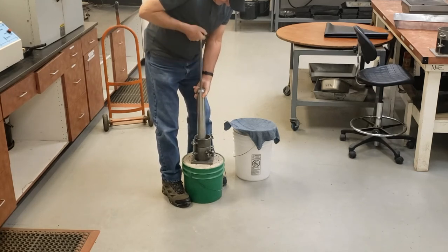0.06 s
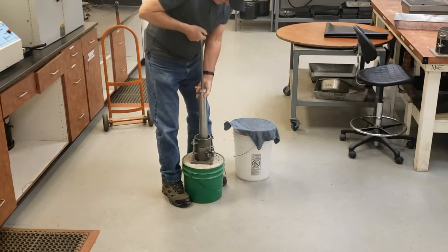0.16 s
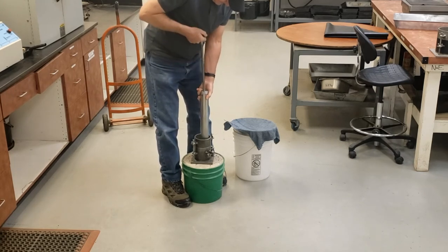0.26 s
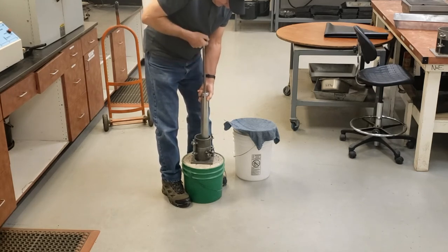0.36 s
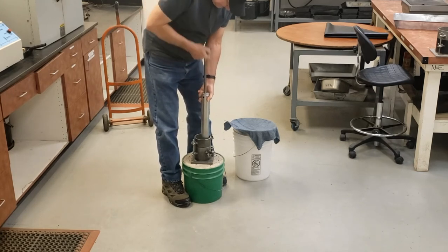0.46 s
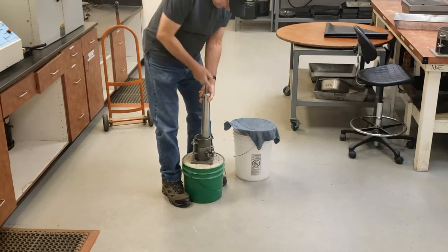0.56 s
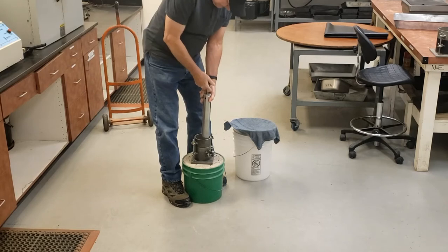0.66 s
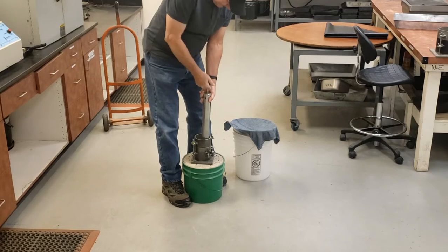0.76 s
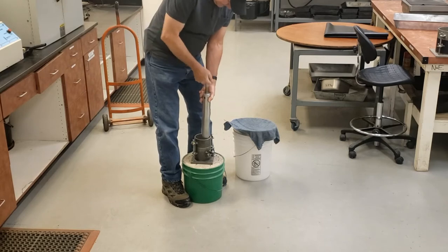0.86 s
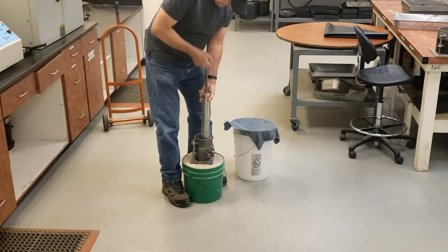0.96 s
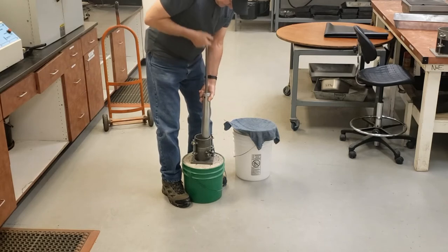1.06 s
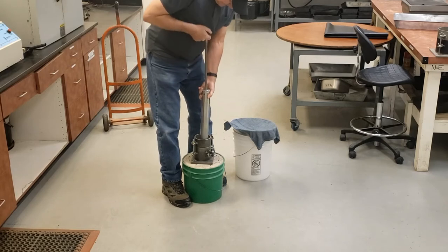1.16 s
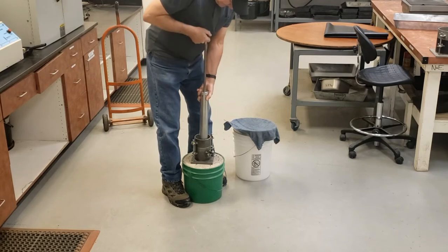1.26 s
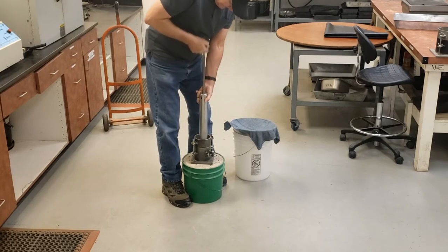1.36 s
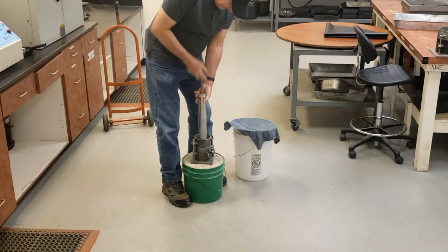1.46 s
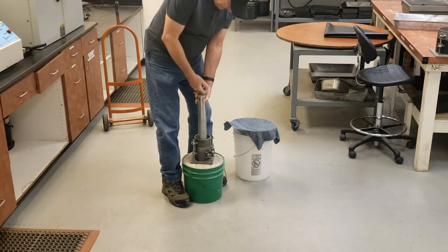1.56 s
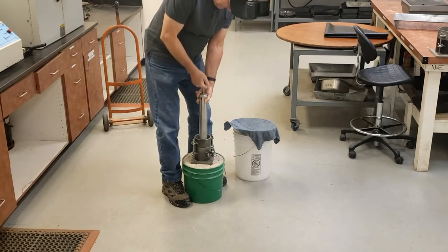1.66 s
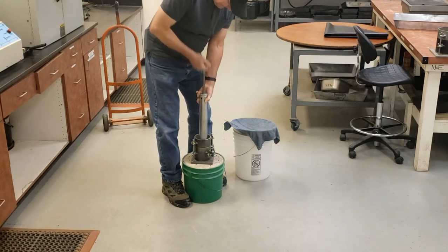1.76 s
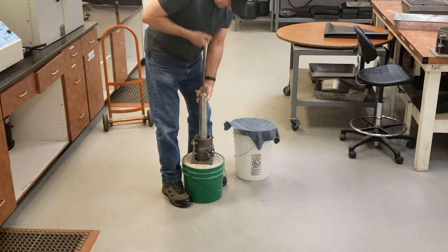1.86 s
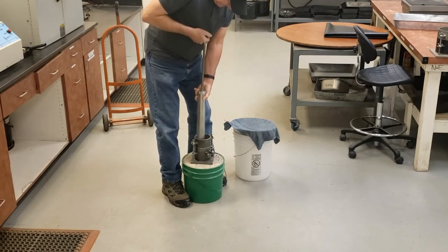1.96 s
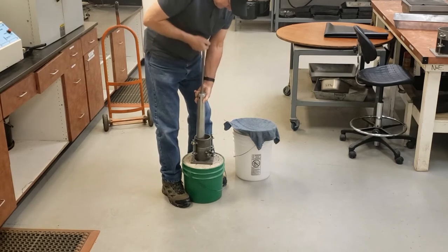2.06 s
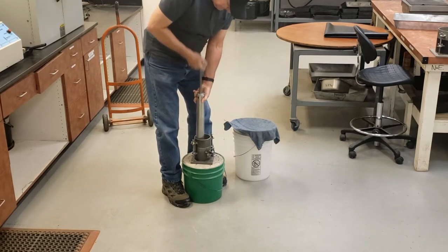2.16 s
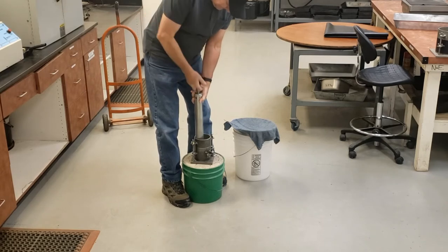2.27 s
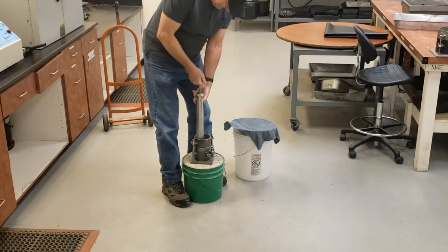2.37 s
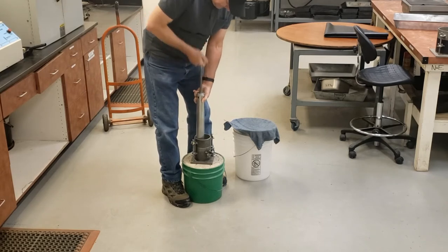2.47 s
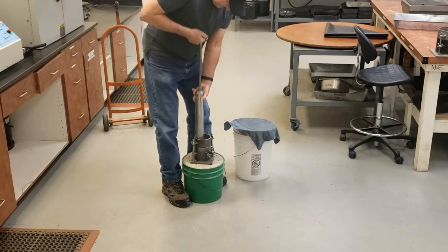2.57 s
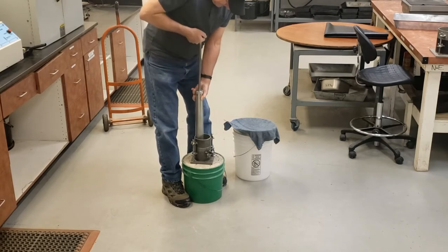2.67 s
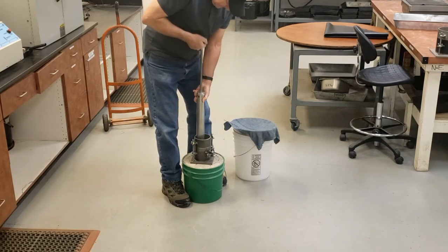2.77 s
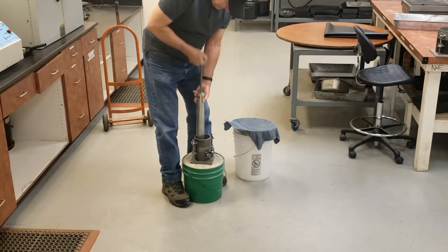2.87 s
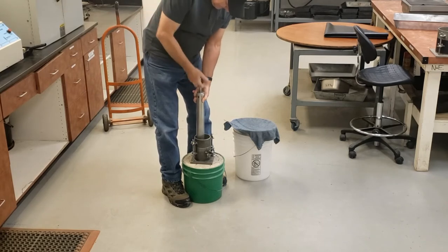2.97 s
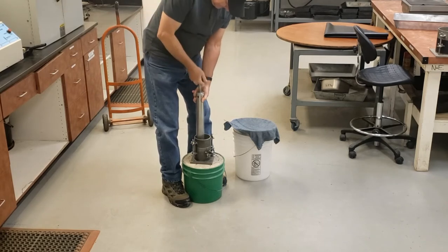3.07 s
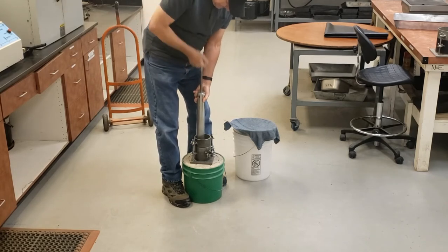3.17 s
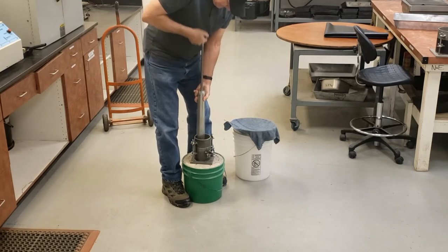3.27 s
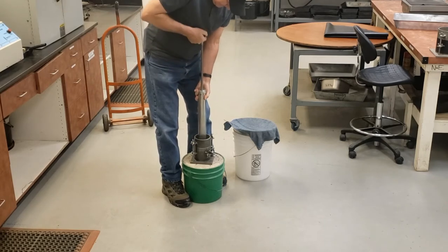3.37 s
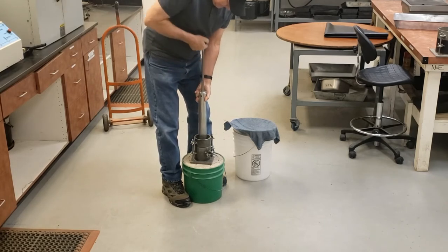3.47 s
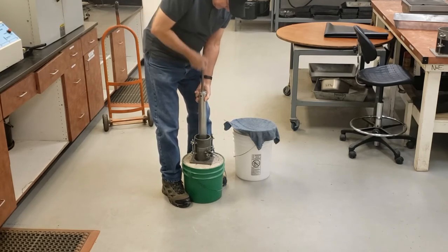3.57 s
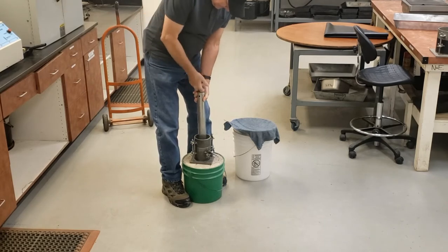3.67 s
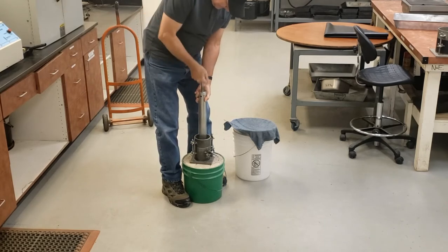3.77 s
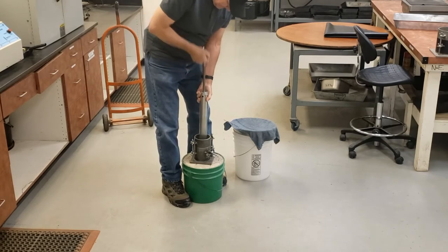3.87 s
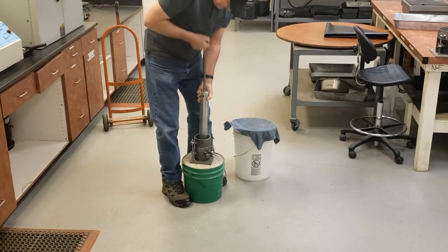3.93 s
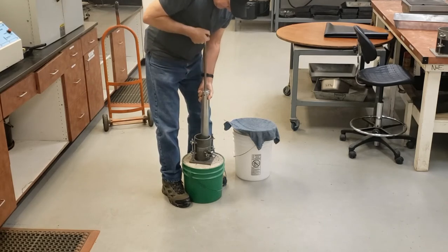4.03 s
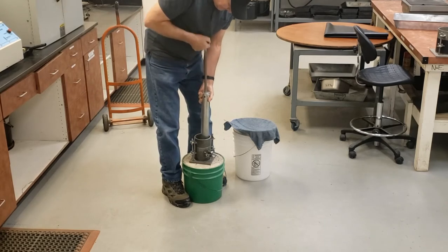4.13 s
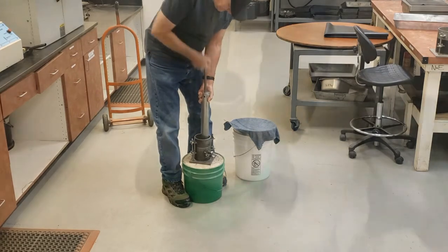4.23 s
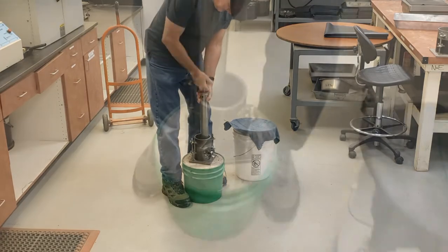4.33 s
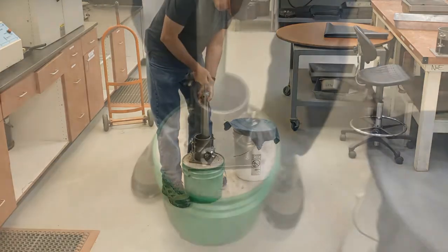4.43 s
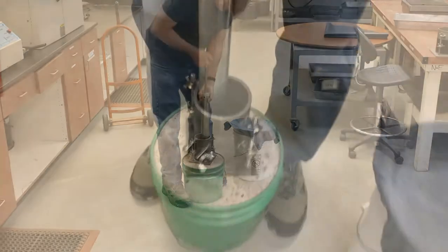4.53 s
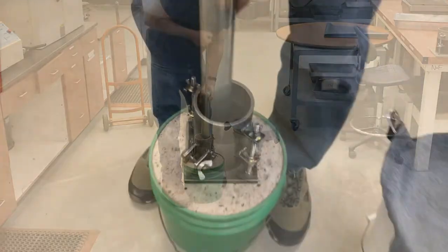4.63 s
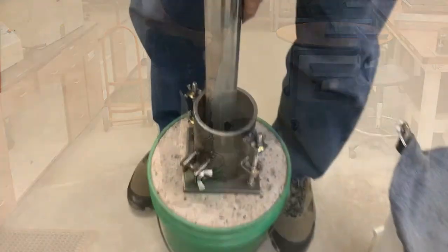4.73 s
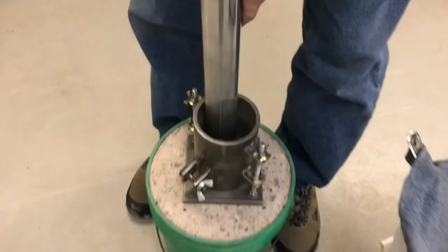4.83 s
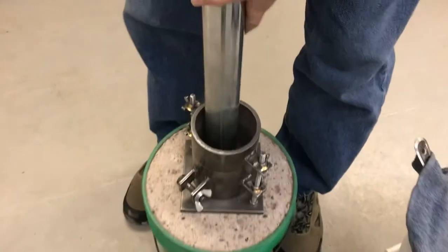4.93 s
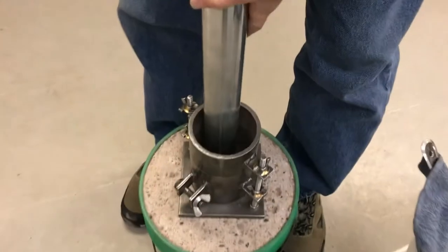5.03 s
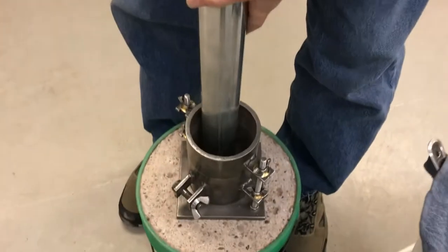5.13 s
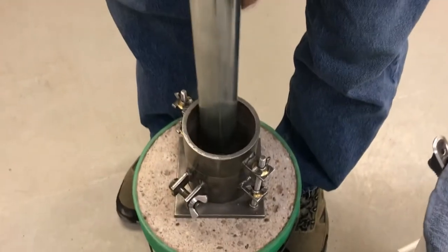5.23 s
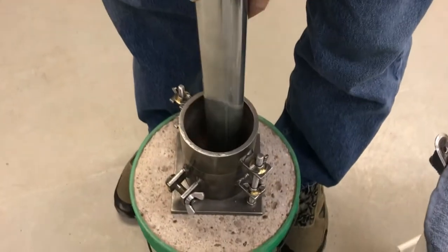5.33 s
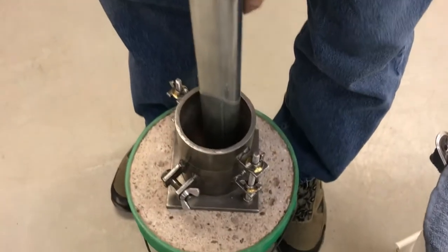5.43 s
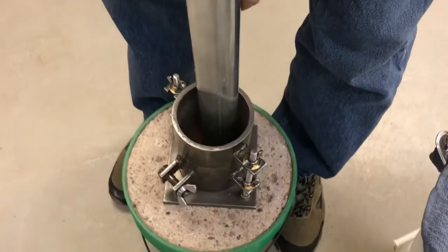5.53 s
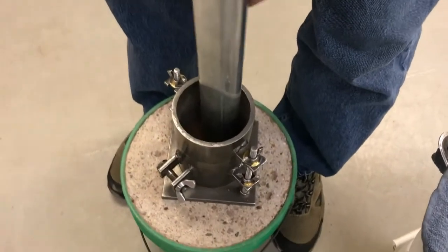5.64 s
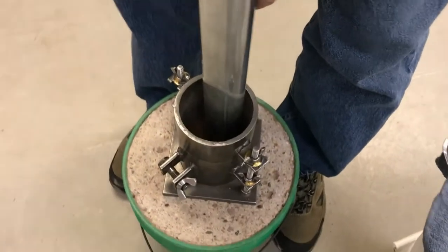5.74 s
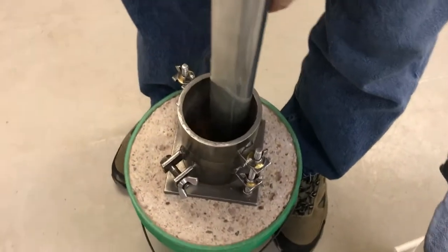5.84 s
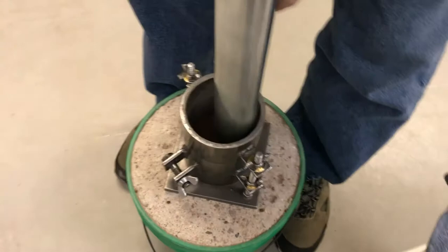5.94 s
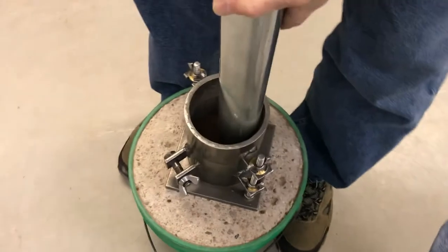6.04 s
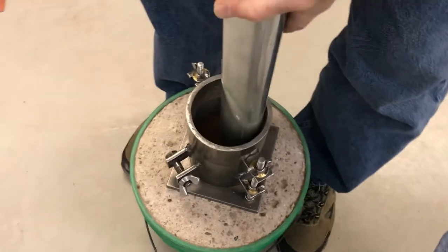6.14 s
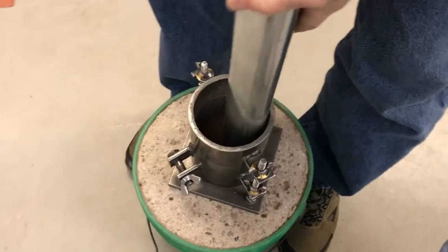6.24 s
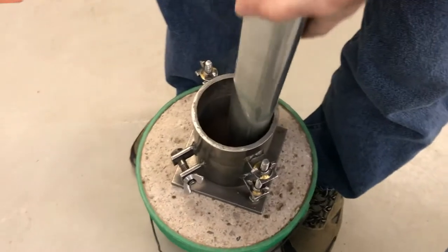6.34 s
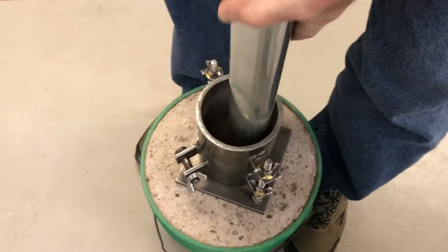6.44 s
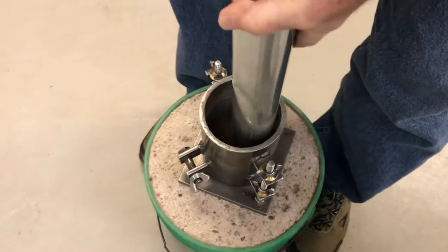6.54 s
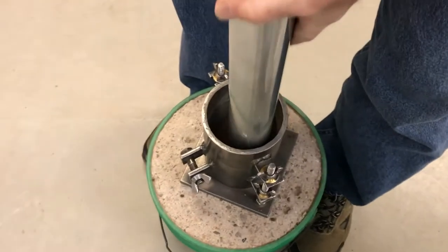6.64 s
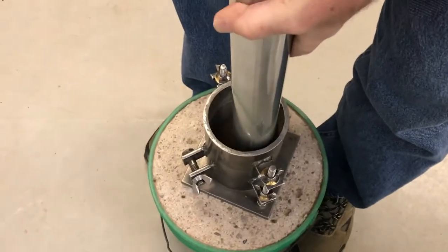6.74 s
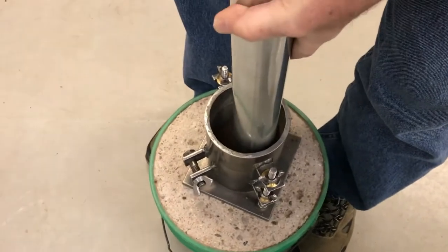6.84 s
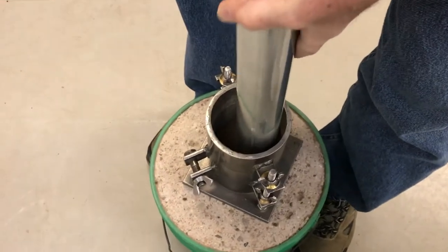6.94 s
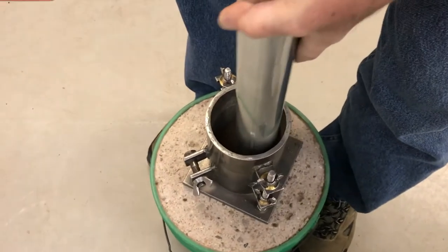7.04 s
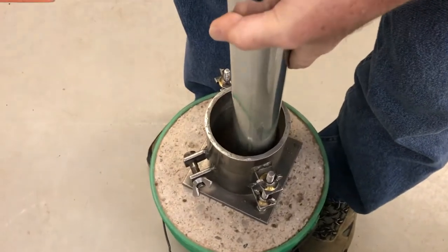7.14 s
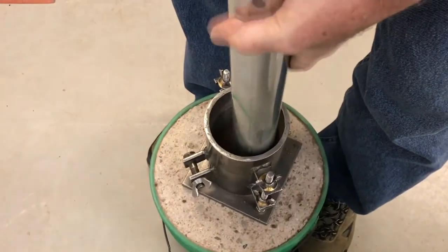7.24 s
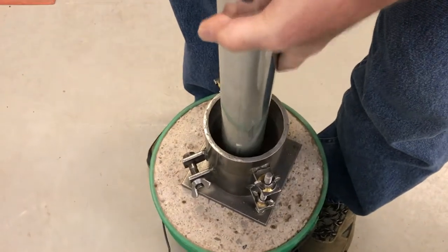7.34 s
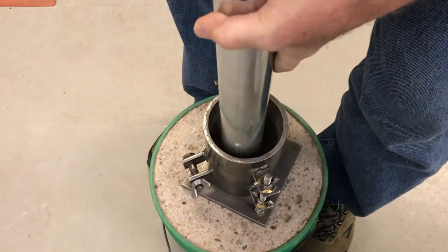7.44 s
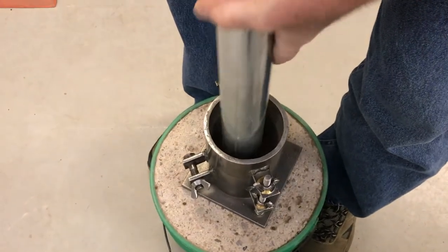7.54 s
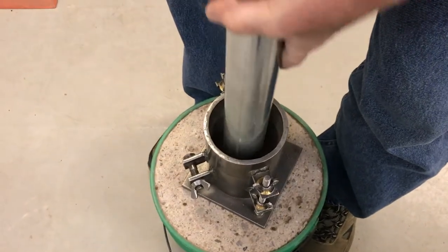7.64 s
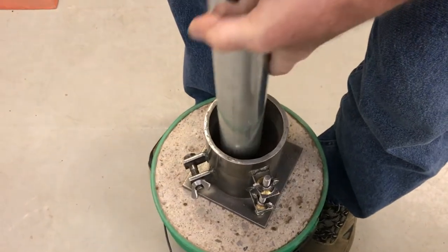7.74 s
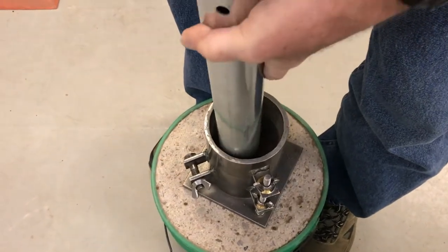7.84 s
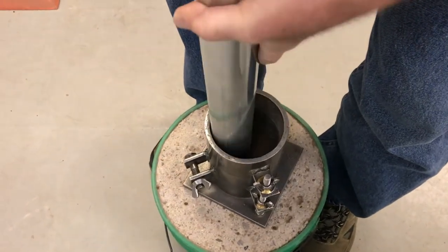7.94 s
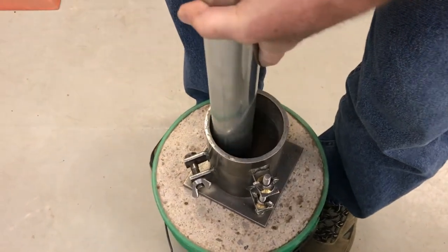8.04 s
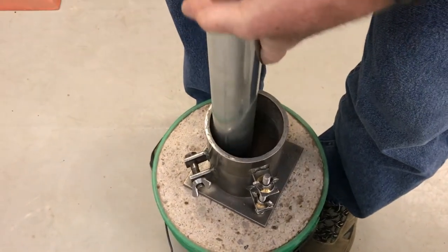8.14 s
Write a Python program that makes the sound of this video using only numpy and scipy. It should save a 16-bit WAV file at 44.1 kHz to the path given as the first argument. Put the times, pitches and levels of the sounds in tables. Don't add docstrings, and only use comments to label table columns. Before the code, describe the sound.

In a hard-floored lab, a metal weight slides on its sleeve, clanks brightly at the top, then drops with a duller thud on soil, about every 0.7 seconds. At first it is across the room, stereo and echoing over low ventilation rumble; after four and a half seconds it crossfades to a dry, mono close microphone with loud clanks, bounces, rattles and scraping.

```python
import sys
import numpy as np
from scipy import signal
from scipy.fft import rfft, irfft, next_fast_len
from scipy.io import wavfile
from scipy.ndimage import uniform_filter1d, minimum_filter1d, map_coordinates

SR = 44100
rng = np.random.default_rng(int(sys.argv[2]) if len(sys.argv) > 2 else 0)


def level_to_linear(level):
    exponent = np.asarray(level, float) / 20
    return 10 ** exponent


def wav_out(sig):
    wavfile.write(sys.argv[1], SR, np.round(np.clip(np.atleast_2d(sig).T, -1, 1) * 32767).astype(np.int16))


N = 361619

SLEEVE_HZ = [260, 576, 895, 1432, 1620, 2120, 3135, 3455, 3662, 3870, 4211, 4400, 4710, 4900, 5250, 5794,
             6338, 7950, 9130, 9830, 10380, 11747, 14900]
# (level [dB], t60 [s])
SLEEVE = [(-11.5, 0.84), (-10.5, 0.27), (-28, 0.79), (-5, 0.49), (-9.5, 0.059), (-7, 0.049), (-6.5, 0.19),
          (-7, 0.017), (-2, 0.27), (-16.5, 0.34), (-33, 0.18), (-9, 0.017), (-19.5, 0.1), (-9.5, 0.13),
          (-33, 0.22), (-23, 0.12), (-4, 0.44), (-26, 0.079), (11.5, 0.48), (10, 0.54), (3, 0.05),
          (14.5, 0.34), (-20, 0.63)]
# (start [s], end [s], level
# [dB], treble [dB])
LIFTS = [(4.496, 4.595, -41.5, -5), (4.835, 4.917, -37, -6), (5.145, 5.242, -32.5, -3.5),
         (5.468, 5.565, -39.5, -6), (5.865, 5.936, -26.5, -6.5), (6.145, 6.21, -39.5, -4),
         (6.538, 6.634, -32, -6.5), (6.863, 6.964, -42.5, -2), (7.227, 7.273, -33.5, -7.5),
         (7.505, 7.551, -39, -7), (7.75, 7.854, -59.5, 7.5), (7.855, 7.946, -38.5, -6),
         (8.145, 8.191, -38.5, -3.5), (4.912, 4.94, -38, -13), (5.599, 5.626, -36, -23),
         (7.558, 7.59, -45, -26), (6.947, 6.96, -58, -24)]
# (start [s], end [s])
DISSOLVE = (3.82, 4.81)


def unit(x):
    return x / np.sqrt(np.mean(x ** 2) + 1e-20)


def along(points, hz):
    f, v = np.transpose(points)
    return np.interp(np.log(hz + 1), np.log(f + 1), v)


def curves(rows):
    s, *cols = np.transpose(rows)
    return [np.interp(np.arange(N) / SR, s, c) for c in cols]


def wobble(rate):
    knots = rng.standard_normal(int(N * rate / SR) + 4)
    return map_coordinates(knots, [np.arange(N) * rate / SR])


def filtered(x, response):
    n = x.shape[-1]
    m = next_fast_len(n + 8192)
    return irfft(rfft(x, m) * response(np.fft.rfftfreq(m, 1 / SR)), m)[..., :n]


def patched(x, patchy_db):
    z = signal.stft(x, nperseg=128)[2]
    field = uniform_filter1d(rng.standard_normal(z.shape), size=2, axis=0)
    field = uniform_filter1d(field, size=12, axis=1)
    return signal.istft(z * level_to_linear(patchy_db * unit(field)), nperseg=128)[1][:len(x)]


def add(track, s, sound):
    track[max(round(s * SR), 0):][:len(sound)] += sound


def clanks(rows, drive_db, damping, grit_db, thump_db, grip_db, held_db_per_s, mid_db, top_db,
           edge_db, shine_db):
    track, t = np.zeros(N + SR), np.arange(SR // 2) / SR
    for s, db, free, low, bright in rows:
        colour = [(300, thump_db), (580, thump_db + 2.5), (1700, low + 6), (3800, 0.0053),
                  (4900, mid_db), (6300, mid_db - 1.0 + 0.87 * bright),
                  (9500, bright + top_db), (12000, bright + edge_db)]
        closing = np.clip((t - free) / 0.0042, 0, 1)
        grip = level_to_linear(grip_db * closing - held_db_per_s * np.clip(t - free, 0, None))
        steel = blow(t, colour, damping, grit_t60=0.2, grit_db=grit_db, rise=0.00033, shine_db=shine_db)
        add(track, s, level_to_linear(db + drive_db) * grip * (1 - (t / t[-1]) ** 4) * steel)
    return track[:N]


def drops(rows, t60, body, ring_db, thud_db, grit_db, rise=0.00098):
    track, t = np.zeros(N + SR), np.arange(SR // 5) / SR
    for s, db, thud, low, top in rows:
        colour = [(500, low - 6), (1700, low + 5), (4000, 0), (8500, top + 5)]
        steel = blow(t, colour, t60 / 0.5, grit_t60=0.81 * t60, grit_db=grit_db, rise=rise,
                     shine_db=-19.0, lumpy_db=4)
        add(track, s, level_to_linear(db + ring_db) * steel)
        soil = ringing(body, t, [(200, 0.025)], 0.79, split_hz=29.0, rise=0.0044, loose=0.99)
        add(track, s, level_to_linear(thud + thud_db) * soil * (1 - t / t[-1]))
    return track[:N]


def blow(t, colour, damping, grit_t60, grit_db, rise, shine_db, lumpy_db=0):
    # (frequency [Hz], level per Hz [dB])
    crack = [(180, -30), (300, 3.5), (1200, -5.5), (1480, -6), (2740, -8), (3080, -9), (4830, -10.5),
             (7320, -9), (16000, -7)]
    noise = rng.standard_normal(len(t))

    def response(hz):
        lumps = lumpy_db * map_coordinates(noise, [hz / 550])
        level = along(crack, hz) + along(colour, hz) + lumps
        return level_to_linear(level) * singing(hz, over_db=12.0, width_hz=115)

    grit = unit(filtered(noise, response))
    dull = filtered(grit, lambda hz: 1 / (1 + (hz / 6500) ** 6))
    grit = dull + (grit - dull) * level_to_linear(9.5 - 60 * t / (0.67 * grit_t60))
    rattle = level_to_linear(grit_db - 60 * t / grit_t60) * (1 - np.exp(-t / rise)) * grit
    lines = [(hz, db + shine_db * (hz > 8000)) for hz, db in colour]
    modes = [(hz, db, t60 * (0.5 if hz > 8000 else 1))
             for hz, (db, t60) in zip(SLEEVE_HZ, SLEEVE)]
    return ringing(modes, t, lines, damping, split_hz=18.9, rise=rise, loose=1.34) + rattle


def ringing(modes, t, colour, damping, split_hz, rise, loose):
    hz, db, t60 = (np.repeat(c, 3)[:, None] for c in np.transpose(modes))
    chance = rng.standard_normal((len(hz), 3))
    lasting = (np.arange(len(hz)) % 3 == 0)[:, None]
    life = t60 * damping * (1 + lasting * np.where(hz > 8000, 0.9, 2.8))
    strength = db + along(colour, hz) + 0.1 * loose * chance[:, :1] - 13.6 * lasting
    level = level_to_linear(strength - 60 * t / life)
    spread = np.clip(hz / 1300, .2, 1)
    split = spread * split_hz * (1 - 0.72 * lasting) * chance[:, 1:2]
    phase = 2 * np.pi * (hz + split) * t + spread * loose * chance[:, 2:]
    return (level * np.sin(phase)).sum(0) * (1 - np.exp(-t / rise))


def singing(hz, over_db, width_hz):
    peaks = [level_to_linear(db + over_db) / (1 + ((hz - c) / width_hz) ** 2)
             for c, (db, _) in zip(SLEEVE_HZ[2:-6], SLEEVE[2:])]
    return 1 + sum(peaks)


def pings(rows):
    track, t = np.zeros(N + SR), np.arange(SR // 2) / SR
    for s, db, hz, t60 in rows:
        trio = np.sin(2 * np.pi * hz * t)
        trio += 0.39 * np.sin(2 * np.pi * (hz + 44.7) * t + hz)
        trio += 0.43 * np.sin(2 * np.pi * (hz - 17.15) * t + s * hz)
        shape = level_to_linear(db - 60 * t / t60) * (1 - np.exp(-t / 0.00054)) * (1 - (t / t[-1]) ** 4)
        add(track, s, shape * trio)
    return track[:N]


def lifts():
    track = np.zeros(N + SR)
    for start, end, db, treble_db in LIFTS:
        t = np.arange(round((end - start) * SR)) / SR
        kicks = (rng.random(len(t)) < 220 / SR) * level_to_linear(1.2 * rng.standard_normal(len(t)))
        bursts = signal.lfilter([1], [1, -np.exp(-1 / (0.00022 * SR))], kicks)
        catches = rng.standard_normal(len(t)) * (.5 + bursts)
        edges = np.clip(np.minimum(t / 0.027, (end - start - t) / 0.007), 0, 1)
        colour = [(500, -0.5), (1500, 0.0), (5000, 1.5), (10000, treble_db)]
        tone = lambda hz: level_to_linear(along(colour, hz)) * singing(hz, over_db=3.5, width_hz=110)
        grating = patched(filtered(catches, tone), patchy_db=5)
        add(track, start, level_to_linear(db) * edges * unit(grating))
    return track[:N]


def jolts():
    # (time [s], peak [dB])
    pushes = [
        (5.247, -2),
        (5.937, -29),
        (6.638, -6.5),
        (7.29, -3.5),
        (7.929, 12.5),
    ]
    track, t = np.zeros(N + SR), np.arange(SR // 5) / SR
    for s, db in pushes:
        swing = np.sin(2 * np.pi * 55 * t) * (1 - np.exp(-t / 0.012))
        add(track, s, level_to_linear(db + 2.5 - 60 * t / 0.043) * swing)
    return track[:N]


def sliding(slides, blows, rest_db, shake_db, shake_t60, hiss_t60):
    t = np.arange(N) / SR
    scrape, hiss = np.outer(level_to_linear(rest_db), np.ones(N))
    for start, end, db, hiss_db in slides:
        settling = level_to_linear(db - 60 * np.clip(t - end, 0, None) / 0.55)
        shape = settling * np.clip((t - start) / 0.0092, 0, 1)
        scrape, hiss = scrape + shape, hiss + level_to_linear(hiss_db) * shape
    for s, *_ in blows:
        since = np.clip(t - s, 0, None)
        scrape = scrape + level_to_linear(shake_db[0] - 60 * since / shake_t60) * (t > s)
        hiss = hiss + level_to_linear(shake_db[1] - 60 * since / hiss_t60) * (t > s)
    return scrape, hiss


def bed(vent_rows, motion, scrape, alike, sing_db, rough_db, patchy_db):
    # (frequency [Hz], level per Hz [dB])
    rumble = [(12, -46), (20, -39), (38, -7.5), (62, -5.5), (129, -16), (151, -22.5), (195, -19.5),
              (270, -27.5), (921, -39), (1500, -46.5), (1950, -79), (3300, -120)]
    draught = level_to_linear(curves(vent_rows)[0] + 2.65 * wobble(4.62))
    vent = draught * rush(lambda hz: level_to_linear(along(rumble, hz)), alike, patchy_db=-2.0)
    catches = level_to_linear(rough_db * (wobble(45) + 0.088 * np.abs(wobble(180))))
    tone = lambda hz: level_to_linear(along(scrape, hz)) * singing(hz, sing_db, width_hz=46)
    slide = unit(catches * rush(tone, alike, patchy_db))
    body = filtered(slide, lambda hz: 1 / (1 + (hz / 6800) ** 12))
    return vent + motion[0] * unit(body) + motion[1] * unit(slide - body)


def rush(gain, alike, patchy_db):
    z = signal.stft(rng.standard_normal((2, N)), nperseg=256)[2]
    field = uniform_filter1d(rng.standard_normal(z.shape[1:]), size=5, axis=0)
    field = uniform_filter1d(field, size=9, axis=1)
    pair = signal.istft(z * level_to_linear(patchy_db * unit(field)), nperseg=256)[1][:, :N]
    turn = lambda hz: np.arccos(np.clip(along(alike, hz), -1, 1)) / 2
    mid, side = filtered(pair, lambda hz: gain(hz) * [np.cos(turn(hz)), np.sin(turn(hz))])
    return unit(np.array([mid + side, mid - side]))


def lab(x, shorten):
    # (frequency [Hz], t60 [s])
    room_t60 = [(100, 0.51), (500, 0.81), (2000, 0.52), (6000, 0.44), (12000, 0.28)]
    wet, step = np.zeros((2, N + 2 * SR)), SR // 3
    for k in range(0, N, step):
        hz, t, z = signal.stft(rng.standard_normal((2, SR * 2 // 3)), SR, nperseg=256)
        decay = level_to_linear(-60 * t / (shorten * along(room_t60, hz))[:, None])
        tail = signal.istft(z * decay, SR, nperseg=256)[1]
        part = signal.fftconvolve(x[None, k:k + step], tail / np.linalg.norm(tail[0]), axes=1)
        wet[:, k + 250:][:, :part.shape[1]] += part
    return wet[:, :N]


def limited(x, top):
    need = np.minimum(1, top / (np.abs(x).max(0) + 1e-9))
    return x * uniform_filter1d(minimum_filter1d(need, size=89), size=44)


def near_camera():
    # (time [s], peak [dB], free ring [s], low ring [dB], top ring [dB])
    stops = [
        (4.5852, -7, 0.064, -7.5, -10),
        (5.2441, 1.5, 0.042, -11, -12),
        (5.9389, -3.5, 0.025, -9.5, -10.5),
        (6.636, -6, 0.037, -6.5, -8),
        (7.2934, -5, 0.035, -14, -14.5),
        (7.933, -4.5, 0.033, -9, -7),
    ]
    # (time [s], peak [dB], thud [dB], low ring [dB], top ring [dB])
    landings = [
        (4.274, -9.5, -24.5, -5.5, -13.5),
        (4.9333, -2.5, -14, -12.5, -18),
        (5.626, -2.5, -11.5, -4, -11),
        (6.28, 7.5, -14, -16.5, -11),
        (6.9658, -0.5, -14, -5.5, -8.5),
        (7.5849, 4, -14.5, -5.5, -8.5),
    ]
    # (time [s], peak [dB], low ring [dB], top ring [dB])
    skips = [(4.9463, 0, -7, -16), (5.006, -15, -14, -18), (5.0186, -20, -6, -26),
             (5.0434, -10, -16, -22.5), (5.068, -24, -5, -29), (5.1027, -12.5, -7, -14),
             (5.638, -21, 5.5, 4), (5.676, -34, -12, -12), (5.683, -9, -7, -6.5),
             (5.7391, -11.5, -8, -16.5), (5.7922, -20, -2, -11), (6.2894, -8, 10.5, 0),
             (6.353, -14.5, -22, -15), (6.4017, -7.5, -12, -5.5), (7.0409, -11.5, -12, -7),
             (7.087, -15, -12, -10), (7.645, -15, -7, -7), (7.7057, -11, -13, -5.5)]
    # (time [s], peak [dB], low ring [dB], top ring [dB])
    knocks = [(4.4364, -19, -4, -17), (4.462, -24.5, -10, -13), (4.8795, -21, -5, -15),
              (5.35, -25, -14, -11), (5.581, -23, -12, -19), (5.9771, -9.5, -9, -16),
              (6.036, -20, -17, -15), (6.2492, -19.5, -3.5, -14), (6.3012, -12.5, -28, -7),
              (6.814, -30.5, 3, -22), (6.862, -30.5, -15, -8), (6.911, -29, -15, -18),
              (7.158, -41, 14, -25), (7.19, -34, -18, 8), (7.219, -21, -1, -11), (7.251, -35, -10, -20),
              (7.416, -23.5, -10, -11.5), (7.441, -31.5, -1, -15), (7.489, -29, -11, -19),
              (7.515, -20, -1.5, -15), (7.547, -25, -8, -15), (8.048, -20, -7, -12),
              (8.1357, -30.5, -10, -11)]
    # (time [s], peak [dB], low ring [dB], top ring [dB])
    snags = [(4.8468, -35, -19, -4), (5.035, -19, -8, -9), (5.1496, -37, -10, -10), (5.186, -19, -12, -12),
             (5.206, -20, -12, -14), (5.33, -18.5, -5, -18), (5.367, -25, -12, -16), (5.421, -48, -11, -16),
             (5.4773, -32, -17.5, -24), (5.4913, -31, -22, -16), (5.5257, -28.5, -9, -3),
             (5.779, -41, -7, -16), (5.8753, -16.5, -5, -16), (5.891, -34, -4, -14), (6.1588, -34, -7, -16),
             (6.1858, -23.5, -18, -15), (6.5544, -25, -5, 9), (6.582, -17.5, -4, -12),
             (6.6222, -17.5, -20, -17), (7.049, -17, -17, -14), (6.411, -26, -15, -16),
             (5.637, -15, -1, -9), (7.237, -28, 5, -14), (7.27, -18, -20, -16), (7.847, -32, -6, -1),
             (7.8928, -27, -13, -14)]
    # (time [s], peak [dB], frequency [Hz], t60 [s])
    contact_pings = [(5.0045, -16, 3650, 0.036), (5.043, -4.5, 3660, 0.034), (5.0715, -28, 3490, 0.045),
                     (5.103, -29, 2220, 0.056), (5.1865, -26, 4470, 0.048), (5.258, -1.5, 6330, 0.044),
                     (5.25, -1, 4900, 0.095), (5.3, -31, 3665, 0.42), (5.26, -4.5, 1450, .08),
                     (5.305, -20.5, 2155, .06), (5.34, -28, 4280, .06), (5.671, -14, 3670, 0.043),
                     (5.684, -11, 3780, 0.041), (5.74, -23, 3660, 0.045), (5.905, -30, 3000, 0.037),
                     (5.9385, -3.5, 4900, 0.075), (5.948, 0.5, 3654, 0.069), (6.008, -20, 4230, 0.072),
                     (6.036, -18, 4230, 0.062), (6.25, -24, 3674, .08), (6.353, -26, 3530, 0.042),
                     (6.4025, -2, 3560, 0.028), (6.403, -21, 4900, 0.074), (6.41, -22.5, 2175, 0.034),
                     (6.637, 1.5, 3670, 0.12), (6.637, 0.5, 4975, 0.077), (6.967, -7, 3297, 0.022),
                     (7.041, -14, 3580, 0.047), (7.044, -14, 1475, 0.037), (7.087, -18, 3430, 0.034),
                     (7.157, -34, 2190, 0.026), (7.2455, -15, 3470, 0.037), (7.294, -8, 4886, 0.083),
                     (7.294, -3.5, 9130, 0.086), (7.309, -13, 4510, .03), (7.417, -30.5, 1465, 0.076),
                     (7.49, -33, 3640, .05), (7.294, -22, 7870, 0.074), (5.89, -26, 2300, 0.055),
                     (5.92, -36, 3130, 0.046), (5.2, -26, 3110, 0.046), (5.63, -17, 591, 0.085),
                     (6.97, -27.5, 601, 0.17), (7.646, -10, 3490, 0.024), (7.707, -8.5, 3647, 0.049),
                     (8.049, -26.5, 3760, 0.04),
                     (4.899, -24, 5200, .03), (4.899, -29, 2150, .04), (4.948, -13, 3266, 0.054),
                     (5.8, -39, 600, 0.24), (6.283, -8.5, 3114, 0.072), (6.29, 0, 1455, 0.06),
                     (7.936, -10.5, 6340, .14), (7.047, -41, 9560, 0.064), (7.09, -29, 4870, 0.058),
                     (7.936, -9, 4900, 0.069)]
    # (frequency [Hz], level [dB], t60 [s])
    block = [(112.7, -8.5, 0.88), (174.6, -5, 0.5), (212.5, 10.5, 0.071), (252.7, 9.5, 0.077),
             (347.5, -4.5, 0.13), (589, -6, 0.096)]
    # (frequency [Hz], level per Hz [dB])
    scrape = [(180, -1), (300, -3), (773, -5.5), (995, -8.5), (1360, -7.5), (4110, -10.5), (4590, -7),
              (7250, -24.5), (11800, -28), (13000, -64)]
    # (time [s], level [dB])
    vent_rows = [(4.2, -49), (4.55, -38.5), (4.9, -53), (5.17, -46), (5.6, -49.5), (6.2, -50), (6.5, -46),
                 (6.9, -53.5), (8.2, -53)]
    # (ring [dB], rattle over it [dB], rise [s])
    thuddy = (-15, 9.33, 0.0016)
    pingy = (-10, 5, .0006)

    steel = clanks(stops, drive_db=-0.5, damping=0.55, grit_db=-3.0, thump_db=-17.0, grip_db=-11.5,
                   held_db_per_s=59, mid_db=5.5, top_db=4.0, edge_db=-5.0, shine_db=-16.5)
    bounces = [(s, db, -36.5, low, top) for s, db, low, top in skips]
    ticks = [(s, db, -50.5, low, top) for s, db, low, top in knocks]
    contacts = (landings, 0.068, thuddy), (bounces, 0.051, pingy), (ticks, 0.11, thuddy)
    for rows, t60, (ring_db, grit_db, rise) in contacts:
        steel = steel + drops(rows, t60, block, ring_db, thud_db=-8.0, grit_db=grit_db, rise=rise)
    steel = steel + pings(contact_pings)

    fade_in = np.interp(np.arange(N) / SR, DISSOLVE, [0, 1])
    slides = [(start, end, -28.5 + 0.56 * db, treble_db + 8.0) for start, end, db, treble_db in LIFTS]
    slides += [(s, s + 0.16, -43, -11) for s, *_ in landings]
    motion = sliding(slides, stops + landings, rest_db=[-48, -63], shake_db=[-32, -38],
                     shake_t60=0.11, hiss_t60=0.1)
    air = bed(vent_rows, motion, scrape, [(100, 1.0)], sing_db=14.5, rough_db=2.0, patchy_db=4.6)[0]
    room = level_to_linear(-14.5) * lab(steel, shorten=0.32)[0] + fade_in * air
    catches = [(s, db, -70, low, top) for s, db, low, top in snags]
    caught = drops(catches, 0.076, block, -15, thud_db=0, grit_db=7.5)
    mix = steel + lifts() + caught + jolts() + room
    sound = limited(mix[None], top=1.02 * np.clip(fade_in, .1, 1) ** 2.33)
    return filtered(sound, lambda hz: 1 / (1 + (hz / 12300) ** 70) * (1j * hz / (34 + 1j * hz)) ** 2)


def far_camera():
    # (time [s], peak [dB], free ring [s], low ring [dB], top ring [dB])
    stops = [
        (0.0105, -10.5, 0.035, -8, -1.5),
        (1.1369, -8.5, 0.072, -10, -4),
        (1.927, -8, 0.059, -12, -4.5),
        (2.609, -7, 0.034, -8, -1),
        (3.3203, -7.5, 0.039, -9.5, -3),
        (4.0216, -8, 0.023, -11.5, -6),
        (4.6824, -22.5, 0.044, -10.5, -5.5),
    ]
    # (time [s], peak [dB], thud [dB], low ring [dB], top ring [dB])
    landings = [
        (0.639, -20, -38.5, -15.5, -12.5),
        (1.5685, -18.5, -30.5, -8.5, -5),
        (2.302, -17, -34.5, -10.5, -10.5),
        (3.021, -21, -28, -7, -8),
        (3.692, -20, -26.5, -10, -5),
        (4.353, -21.5, -31.5, -7, -9),
    ]
    # (time [s], peak [dB], thud [dB], low ring [dB])
    knocks = [(0.421, -47, -71, -10), (0.874, -49, -52, 0), (1.4061, -30, -68, 1), (1.529, -40.5, -47, 7),
              (1.715, -30.5, -53, -7.5), (1.745, -33.5, -63, -10), (2.2762, -30.5, -64, -8),
              (2.393, -34.5, -65, -6), (2.996, -52, -55, -27), (3.1086, -30.5, -38.5, -7.5),
              (3.256, -36, -50, -8), (3.658, -37, -52, -2), (3.751, -25, -54, -8.5), (4.215, -33, -52, -21)]
    # (time [s], peak [dB], frequency [Hz], t60 [s])
    far_pings = [(0.01213, -36, 3665, 1.07), (3.322, -22, 4890, 0.2), (3.322, -34, 3680, 0.87),
                 (2.611, -42, 3646, 0.78), (1.928, -27, 3665, 0.54), (1.928, -20, 6340, 0.2),
                 (1.138, -22, 1440, 0.52), (1.138, -37, 3665, 0.98), (2.302, -31, 3000, .08),
                 (2.302, -40, 2160, .08), (1.928, -28, 1440, 0.45), (4.023, -40, 3710, 0.71),
                 (2.3, -42, 6300, 0.18), (4.354, -48, 6420, 0.18), (2.998, -38, 5780, 0.056),
                 (.012, -32, 4900, 0.35), (.012, -30, 6340, 0.4), (.28, -53, 2270, 0.073),
                 (0.87, -51, 5830, .08), (1.138, -29.5, 4970, 0.56), (1.138, -19, 3100, 0.072),
                 (1.155, -23, 3674, 0.31), (1.37, -53, 3720, .08), (1.404, -38.5, 2200, 0.062),
                 (1.6, -39, 3700, 0.099), (1.928, -21.5, 4900, 0.37), (2.611, -26.5, 6340, 0.35),
                 (2.611, -22.5, 4960, 0.27), (3.564, -37.5, 3690, 0.06), (3.907, -57, 3640, .1),
                 (4.023, -27, 3300, 0.11)]
    # (start [s], end [s], scrape [dB], hiss over it
    # [dB])
    slides = [(0.5, 0.63, -57.5, 4), (0.96, 1.1, -61, 5.5), (1.27, 1.45, -44.5, -9.5),
              (1.52, 1.57, -47.5, -9), (1.72, 1.86, -56.5, 2), (1.9, 1.93, -72, -16),
              (0.262, 0.275, -47, -20), (2.1, 2.3, -48.5, -3.5), (2.36, 2.44, -57, 1),
              (2.585, 2.61, -53, 5), (2.72, 3.0, -48.5, -4), (3.255, 3.32, -43.5, -9),
              (3.4, 3.66, -48.5, -8), (3.78, 4.0, -51, -2.5), (4.36, 4.7, -40, -1)]
    # (frequency [Hz], level [dB], t60 [s])
    floor_thud = [(113, -21, 0.18), (143.3, 6, 0.041), (182, -6, 0.13), (225, -21, 0.15), (299, -6, 0.045),
                  (461, -9.5, 0.058), (640, -4, 0.028)]
    # (frequency [Hz], level per Hz [dB])
    scrape = [(410, -35.5), (700, -35), (1640, -12.5), (1730, -14), (1890, -12.5), (5000, -9.5), (5760, -7),
              (7270, -13.5), (8610, -11.5), (15400, -12.5)]
    # (time [s], level [dB])
    vent_rows = [(0.0, -43.5), (0.45, -50), (1.04, -44.5), (1.5, -46.5), (2.27, -42), (2.63, -44),
                 (3.5, -48), (4.2, -40), (4.8, -66)]
    # (frequency [Hz], left-right likeness [0-1])
    alike = [(60, 1), (180, 0.9), (550, 0.75), (1650, 0.19), (4970, 0.16), (15000, 0.17)]
    # (frequency [Hz], level [dB])
    echo = [(200, 3), (1500, -2), (5000, -1), (10000, 1.5)]
    # (frequency [Hz], level [dB])
    spread = [(100, -37), (400, -3), (1500, 1), (4000, 0.5), (9000, -1)]

    steel = clanks(stops, drive_db=-9.5, damping=0.74, grit_db=1.5, thump_db=-23, grip_db=-16.5,
                   held_db_per_s=0, mid_db=3.5, top_db=-4.0, edge_db=-1.5, shine_db=-15)
    ticks = [(*row, -12) for row in knocks]
    for rows, t60 in (landings, 0.15), (ticks, 0.19):
        steel = steel + drops(rows, t60, floor_thud, ring_db=-23.5, thud_db=1.0, grit_db=14.0)
    steel = steel + pings(far_pings)

    direct = np.array([steel * level_to_linear(4.5), np.roll(steel, 2) * level_to_linear(0.5)])
    ports = lambda hz: level_to_linear(along(echo, hz)) * [hz >= 0, level_to_linear(along(spread, hz))]
    mid, side = filtered(lab(steel, shorten=0.88), ports)
    wet = np.array([mid + side, mid - side]) * level_to_linear([[-1.5], [-4.5]])
    fade_out = np.interp(np.arange(N) / SR, DISSOLVE, [1, 0])
    motion = sliding(slides, landings, rest_db=[-62, -71], shake_db=[-52, -52],
                     shake_t60=0.37, hiss_t60=0.15)
    air = bed(vent_rows, motion, scrape, alike, sing_db=11.0, rough_db=2.0, patchy_db=0.5)
    sound = limited(direct + wet, top=1.0) + fade_out * level_to_linear([[1.2], [-1.2]]) * air
    return filtered(sound, lambda hz: 1 / (1 + (hz / 15900) ** 60))


def thinned(x, under_db, from_hz, odds):
    hz, _, z = signal.stft(x, SR, nperseg=2048)
    power = (np.abs(z[:, :1024]) ** 2).reshape(len(x), 64, 16, -1).mean(2)
    band = uniform_filter1d(power, size=2, axis=2)
    weak = band < -level_to_linear(2 * under_db) * minimum_filter1d(-band, size=5, axis=1)
    weak |= band < level_to_linear(2 * -36) * band[:, 3:].max(axis=1, keepdims=True)
    weak |= unit(uniform_filter1d(rng.standard_normal(band.shape[1:]), size=7, axis=1)) > odds
    weak &= band < np.roll(band, 2, axis=2)
    z[:, :1024] *= 1 - np.repeat(weak, 16, axis=1) * (hz[:1024, None] > from_hz)
    return signal.istft(z, SR, nperseg=2048)[1][:, :N]


def scene():
    far, near = far_camera(), near_camera()
    far = thinned(far, under_db=-10, from_hz=7300, odds=1.0)
    return far + thinned(near, under_db=-9, from_hz=7600, odds=1.7)


def roll_off(x):
    return signal.sosfilt(signal.butter(12, 16350, fs=SR, output="sos"), x)


def record(dry):
    opening = np.clip(np.arange(N) / (.008 * SR), 0, 1)
    return roll_off(np.clip(dry * opening, -1, 1))


dry = scene()
out = record(dry)
wav_out(out)
```